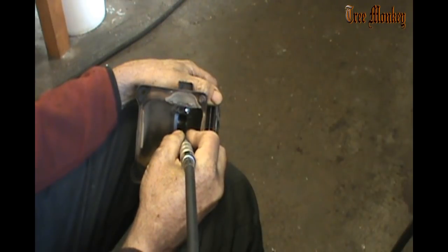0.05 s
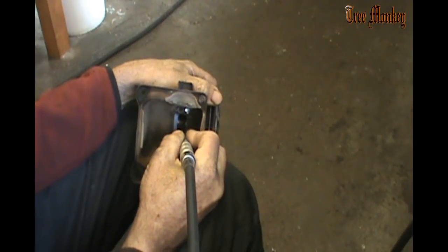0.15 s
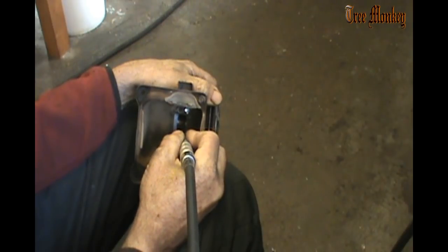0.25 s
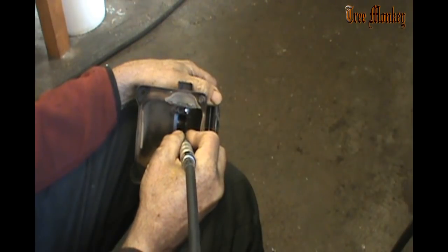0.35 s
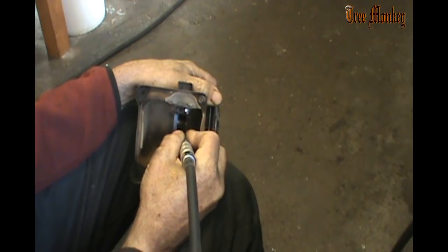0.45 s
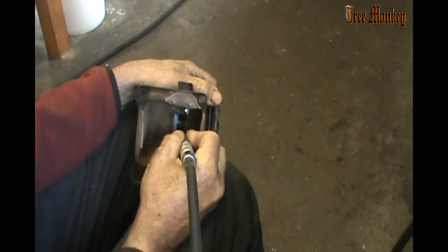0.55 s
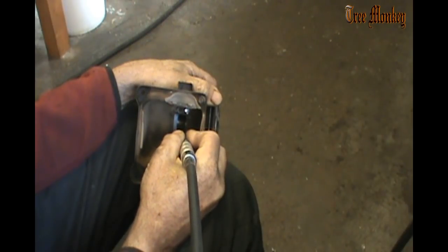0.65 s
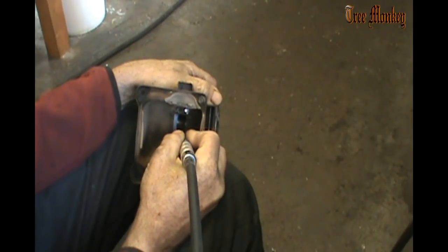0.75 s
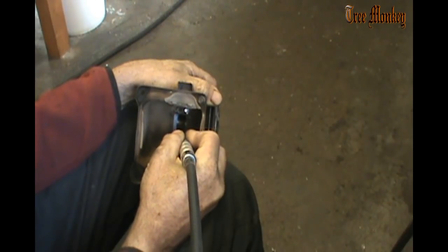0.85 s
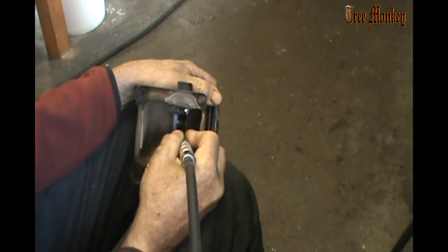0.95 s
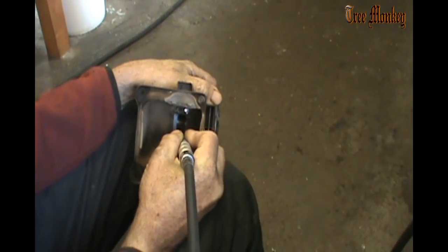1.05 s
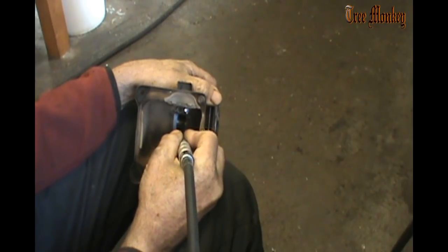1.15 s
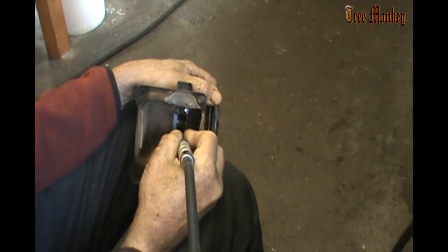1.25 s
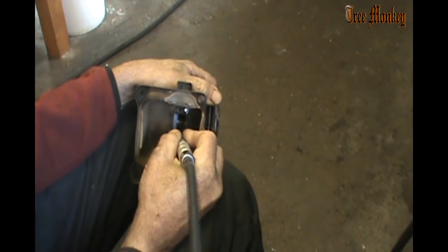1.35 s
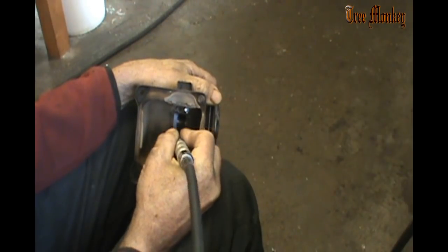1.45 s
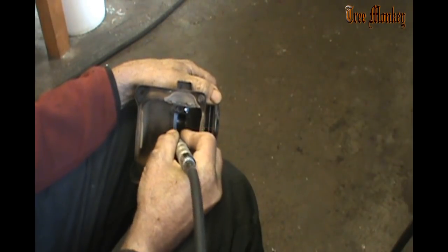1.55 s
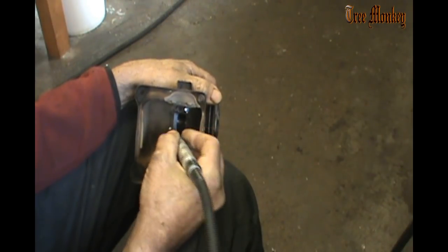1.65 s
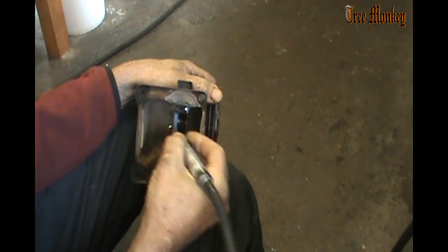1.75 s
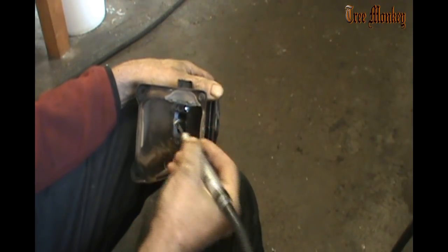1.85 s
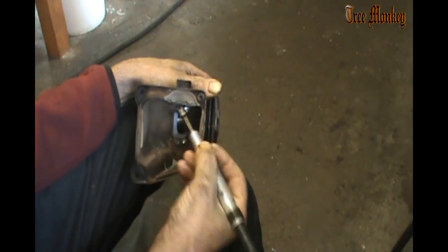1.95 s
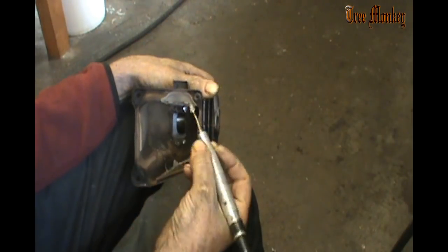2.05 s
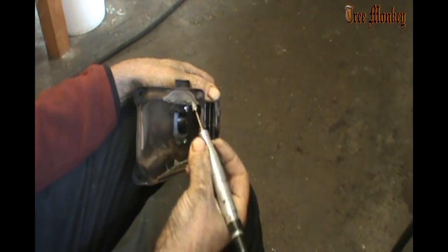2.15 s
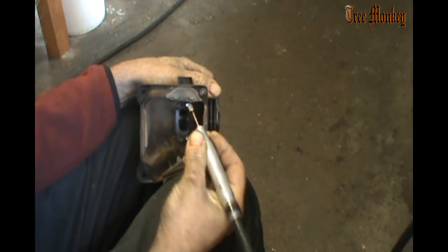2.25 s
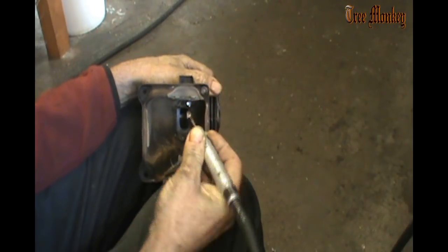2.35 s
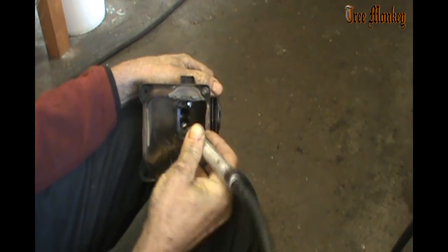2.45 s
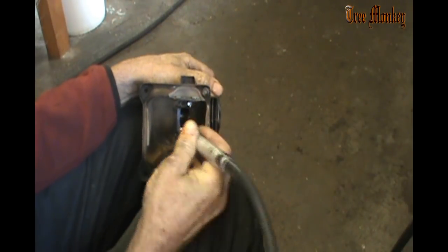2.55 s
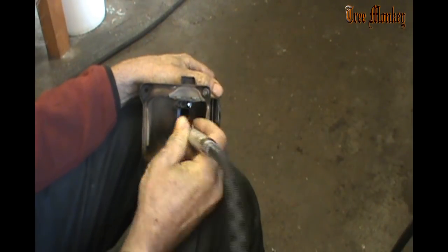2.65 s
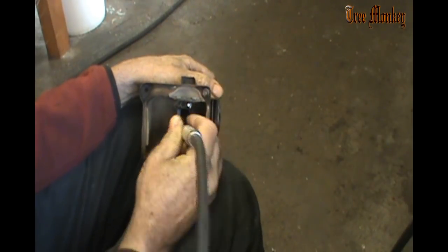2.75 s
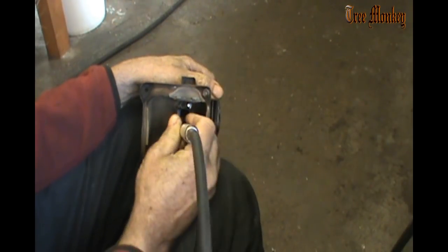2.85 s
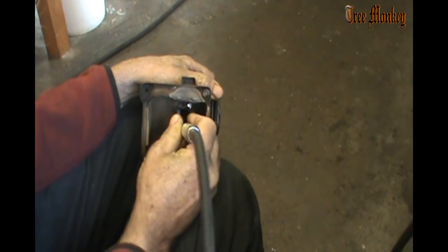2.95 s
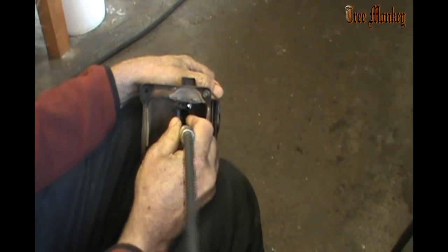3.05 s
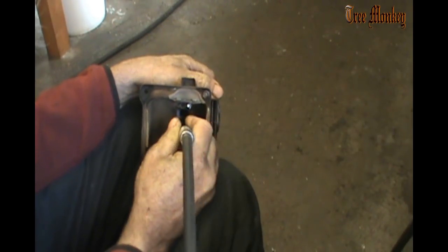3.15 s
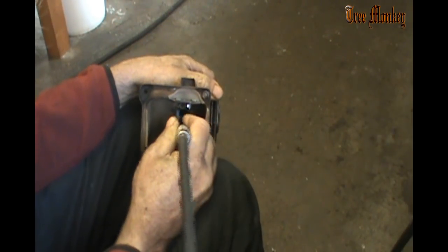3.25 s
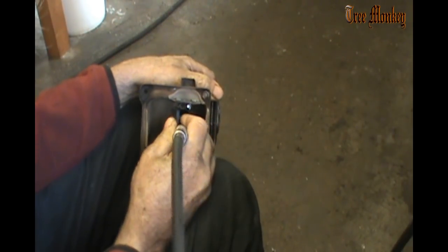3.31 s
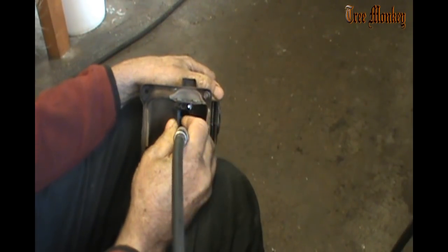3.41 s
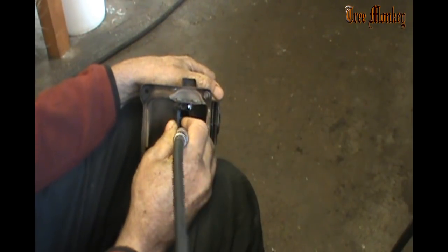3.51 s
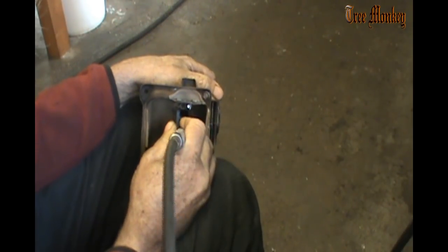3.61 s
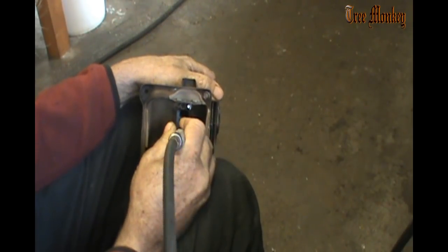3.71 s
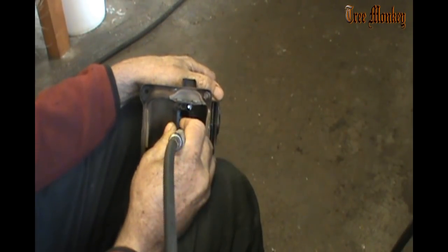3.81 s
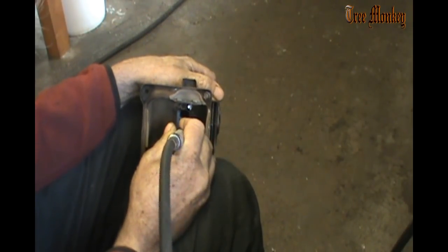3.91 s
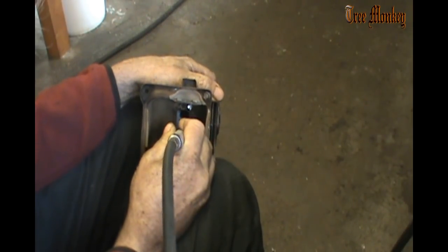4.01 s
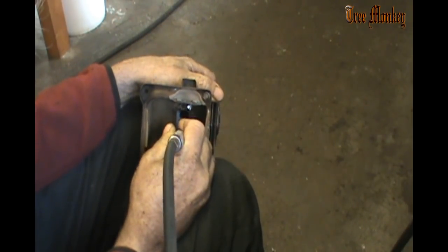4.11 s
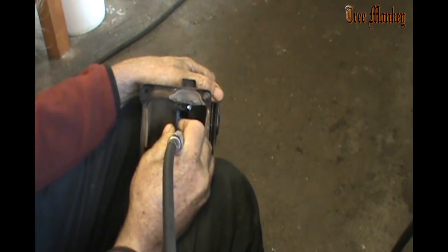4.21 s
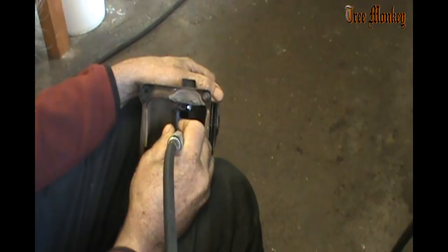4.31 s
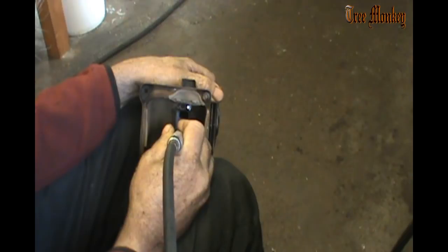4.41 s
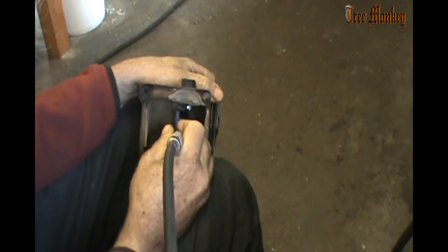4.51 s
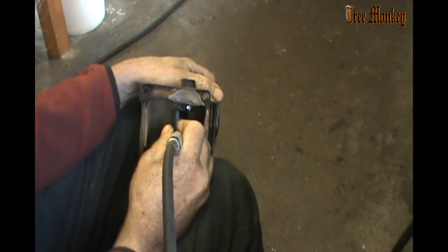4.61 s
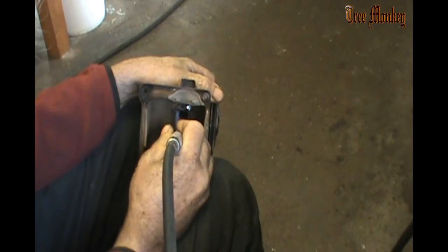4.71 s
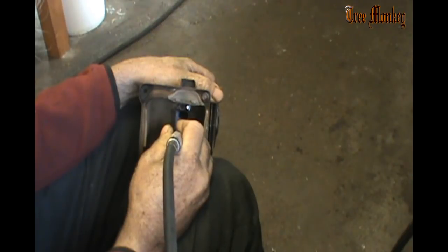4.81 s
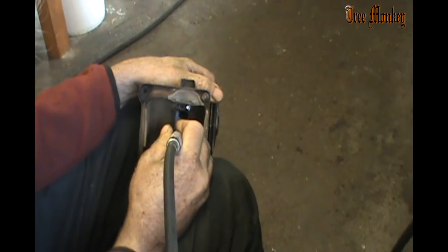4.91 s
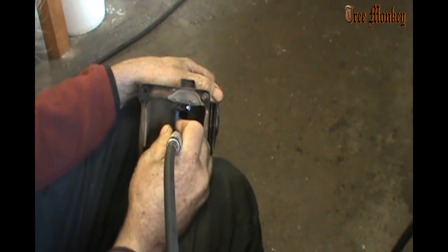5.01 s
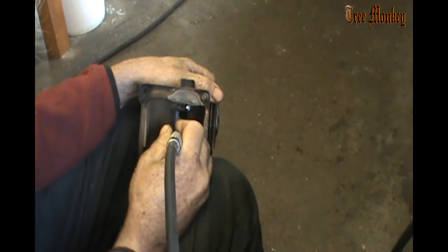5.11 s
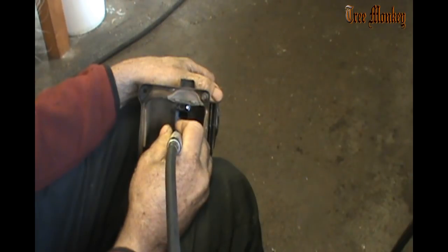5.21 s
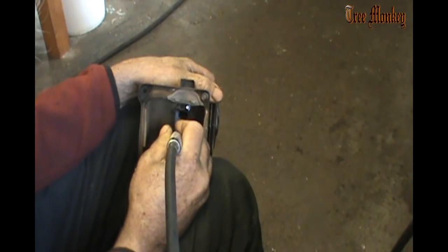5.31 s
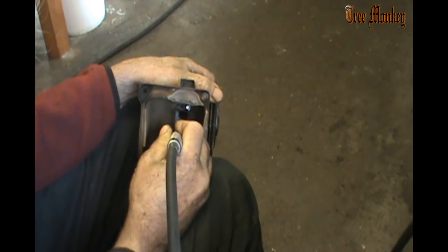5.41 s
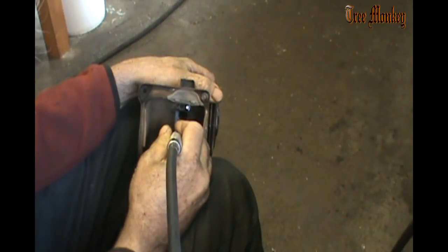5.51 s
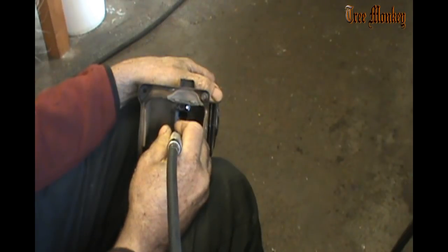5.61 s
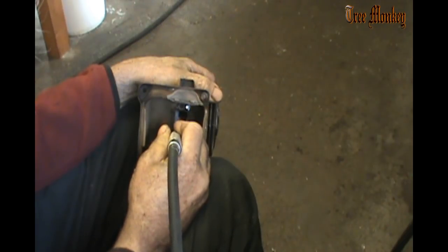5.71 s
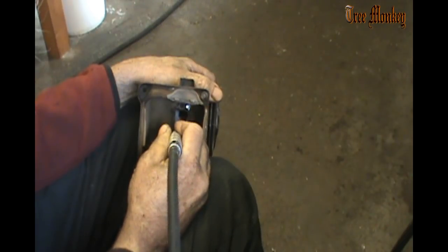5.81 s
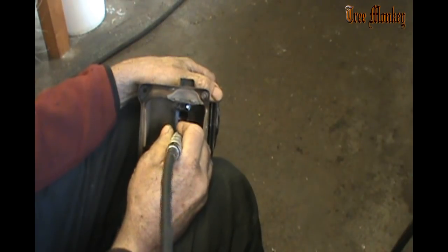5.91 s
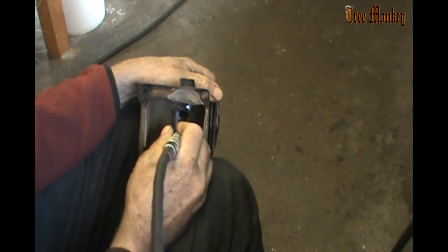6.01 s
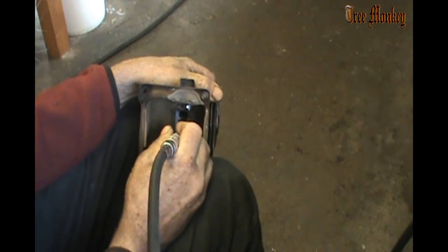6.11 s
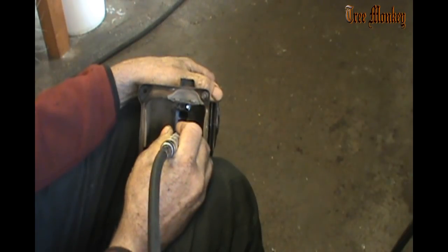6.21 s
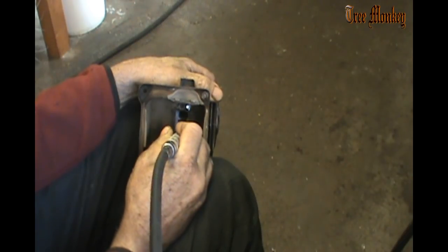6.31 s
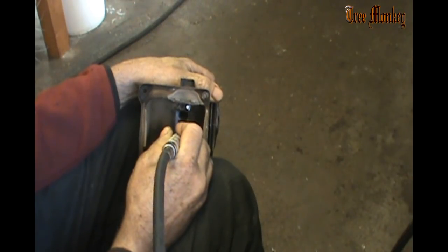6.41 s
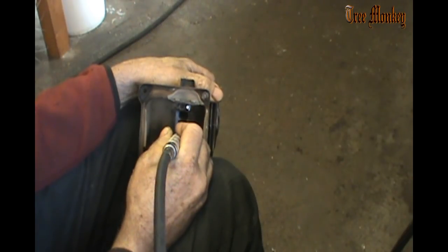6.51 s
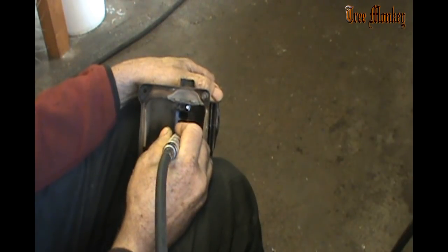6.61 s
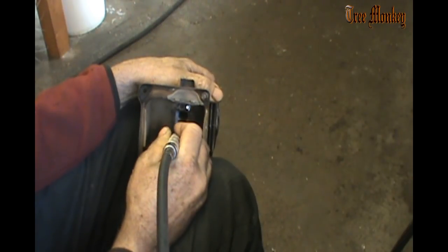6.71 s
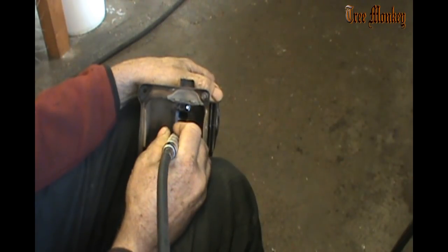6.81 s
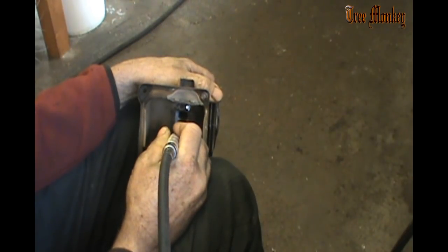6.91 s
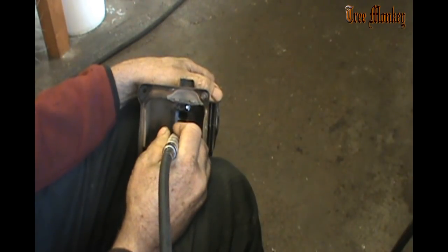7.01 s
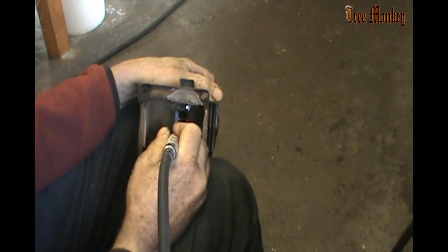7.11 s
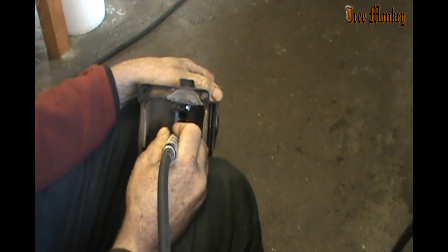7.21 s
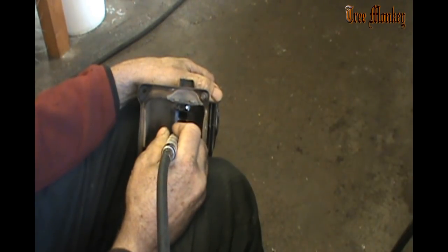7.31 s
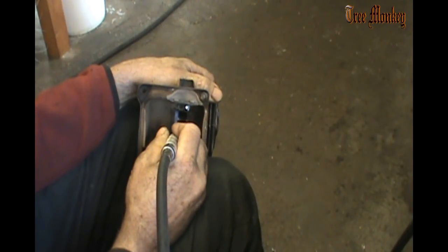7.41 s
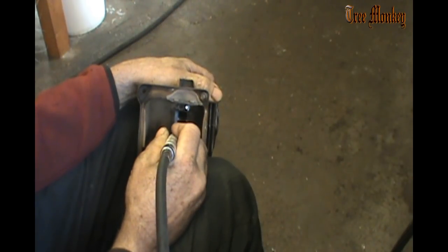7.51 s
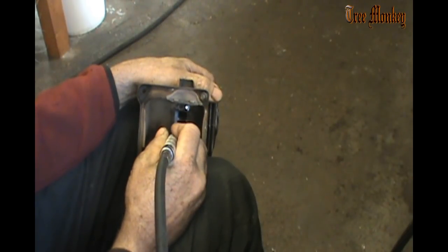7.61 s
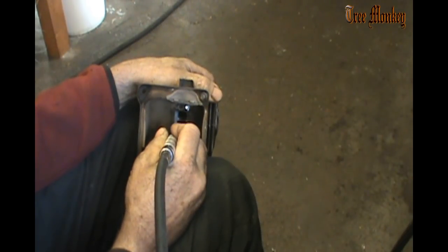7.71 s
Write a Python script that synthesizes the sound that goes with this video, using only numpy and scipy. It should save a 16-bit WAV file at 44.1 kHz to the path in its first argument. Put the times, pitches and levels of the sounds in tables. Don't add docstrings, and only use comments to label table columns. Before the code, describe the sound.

A handheld rotary burr hisses harshly against hollow steel, lifts away to leave its motor whirring and humming, then bites again twice in a workshop.

```python
import sys
import numpy as np
from scipy import signal
from scipy.fft import rfft, irfft
from scipy.io import wavfile
from scipy.ndimage import uniform_filter1d

SR = 44100
rng = np.random.default_rng(int(sys.argv[2]) if len(sys.argv) > 2 else 0)


def amplitude_ratio(level_db):
    exponent = np.asarray(level_db, float) / 20
    return 10 ** exponent


def dump_mix(stems):
    frames = np.atleast_2d(stems).T
    limited = np.clip(frames, -1, 1)
    pcm = np.round(limited * 32767).astype(np.int16)
    wavfile.write(sys.argv[1], SR, pcm)


N = 341768

# start_s, speed_turns_per_s
SHAFT_SPEED = [(0, 229.1), (.8, 223), (1.15, 223), (1.6, 228.5), (1.78, 228.4), (1.93, 230.5), (2.3, 223.1),
               (2.8, 220.5), (3.05, 222.4), (3.8, 225.6), (4.0, 228.4), (4.6, 228.5), (5.0, 226.1),
               (5.5, 226.3), (6.25, 230.9), (6.75, 228.7), (7.05, 226.6), (7.75, 223)]
# start_s, level_db
RECORDER_GAIN = [(0, -34.5), (.85, -35), (1.42, -31.5), (1.9, -29), (2.4, -27.5), (2.6, -27), (3.0, -26),
                 (3.5, -24), (4.08, -23), (4.17, -32), (4.55, -32), (5.02, -37), (5.58, -33), (5.95, -30),
                 (6.52, -30), (6.61, -39), (6.88, -34), (7.75, -36)]

# pitch_hz, density_db (per Hz)
AIR_SPECTRUM = [(15, -62), (25, -53), (90, -29.5), (284, -21), (400, -14.5), (620, -14.5), (881, -13),
                (1120, -3.5), (1930, -15.5), (3500, -17.5), (7420, -17.5), (10800, -14), (14000, -21),
                (17000, -15)]
# pitch_hz, width_hz, level_db
HOUSING_MODES = [(505, 22, -23.5), (792, 58, -4), (1152, 46, 4.5), (1289, 87, -7), (2460, 93, -9),
                 (11000, 310, -24.5)]
# pitch_hz, level_db
MAINS_HUM = [(59.3, -2), (118.6, -2)]
HUM_DB, HUM_WAVER_DB = -28, 3.5
DRONE_HZ, DRONE_REST_DB, DRONE_EDGE_S = 351.5, -28.5, 0.059
# start_s, length_s, added_db
DRONE_SPELLS = [
    (.12, 0.68, 4.5),
    (.82, 0.5, 14),
    (1.58, .17, 16),
    (1.96, 0.07, 10),
    (2.44, 1.7, 13),
    (5.96, .12, 13),
    (6.16, 0.22, 16.5),
    (7.15, .12, 9),
    (7.6, .12, 11),
]
ORDER_SPEEDS = [220.5, 223, 225.5, 227, 228.4, 229.4, 230.8]
ORDER_LEVELS_DB = [
    [-8.5, -7, -9, -11.5, -15.5, -14, -7.5],
    [-7, -10, -10, -9.5, -13.5, -10, -13.5],
    [-27, -25, -29, -29, -29.5, -29, -20.5],
    [-27, -28.5, -24, -34.5, -26.5, -25, -21],
    [-14.5, -14, -17.5, -16, -9.5, -14, -2],
]
ORDER_WAVERS_DB = [1.8, 1.6, 1.2, 2, .8]
WHINE_LOADED_DB = -6.5

# start_s, pressure_db, angle (flat - to steep +)
CONTACTS = [
    [(0, -17, -2), (.59, -16, 0), (.96, -17.5, -2.5), (1.05, -18, -2), (1.41, -17.5, -1.5),
     (1.5, -19.5, -0.5), (1.535, -33, -4), (1.62, -30.5, -5.5), (1.7, -38.5, -5)],
    [(3.75, -33, 2), (4.04, -22.5, -0.5), (4.07, -16.5, -0.5), (4.56, -16, -0.5), (4.77, -16, 0.),
     (4.87, -15, 3.5), (5.72, -18, -2.5), (5.83, -16.5, 1), (5.89, -40, -9.5)],
    [(6.14, -47, 0.), (6.17, -22, 2.5), (6.22, -21, -0.5), (6.434, -18.5, -3.5), (6.55, -17, -1),
     (6.6, -16, 1.5), (7.2, -16, 0.5), (7.45, -16.5, -0.5), (7.75, -17, -1.5)],
]
# centre_s, half_width_s, added_db
BURR_SKIPS = [
    (1.465, 0.0098, -3.5),
    (1.562, .012, 3),
    (1.652, 0.013, 6),
    (3.85, 0.056, 9.5),
    (3.992, 0.016, 5),
]
# pitch_hz, width_hz
STEEL_MODES = [(3132, 16), (3324, 20), (3690, 70), (4000, 50), (4190, 30), (4401, 22), (5200, 120), (5485, 55),
               (5650, 120), (6260, 160), (6500, 120), (6800, 70), (6990, 28), (7500, 90),
               (7835, 50), (8030, 70), (8570, 100), (8830, 30), (9150, 160), (9482, 45), (9900, 72), (10380, 110),
         (10640, 100), (11260, 160), (11700, 260), (12630, 90), (12820, 100), (13560, 90)]
SPOT_TIMES = [
    .25,
    1.15,
    3.75,
    6.0,
    6.3,
]
# first_start_db, first_end_db, second_db, third_db (by
STEEL_DRIVE = [(-4, 7.5, 3.5, 3.5), (4, 10.7, 9.5, 12), (5, 1, 4, 5), (8, 14.8, 12, 12),
               (3, 13.6, 10.5, 12.5), (-3, 7.3, 14, 15), (0, 2.8, -7, 3), (14, 12, 14, 12.5),
               (18, 5.7, 3, 9.5), (11, 8, 10, 9.5), (1, 11.5, 7, 5), (14, 13, 11, 12.5), (5, 9, 4, 9),
               (6, 3, -12, 2),
               (-3, 5, 13.5, 16.5), (2, 14, 13.5, 2), (5, 13, 3, 12), (7, 15, 7, 8), (2, -1, 12.5, 11.5),
              (4, 20, 13, 15.5), (14, -3, 5, 7), (15.5, 5, -7, -2), (7, 10, 13, 11.5), (17.5, 18.5, 17, 16),
              (4, -1, 14, 13.5), (10, 5, 15.5, 18.5), (14, 10, 15.5, 13), (8, 4, 3, 5)]
# pitch_hz, density_db (per Hz)
SMALL_MODE_SPECTRUM = [(900, -32), (1650, -3.5), (2100, -15.5), (2900, -12.5), (3500, -12.5), (4600, -4.5),
                       (5900, -1.5), (7250, -4), (8500, -3), (11500, 3.5), (13300, -0.5), (14000, -8),
                       (15000, -6), (17000, -21)]
SMALL_T60_S = .08
BAND_BORDERS = [2900, 4800, 7300]
CONTACT_RUMBLE_DB = [
    -1.5,
    -7.5,
    -6,
]
FULL_BITE_DB, RUMBLE_FOLLOWS = -11, 0.3
LOW_DB, MIDDLE_DB = -9.5, -8
LOW_PER_ANGLE_DB, MIDDLE_PER_ANGLE_DB = -1.9, -1.13
WANDER_DB = 0.57

# pitch_hz, likeness (0-1), left_minus_right_db, left_lead_rad
MOTOR_PORTS = [(100, .98, -.1, 0), (230, 1, -.3, .18), (450, .64, -.5, -.48), (790, .95, -3.9, -.72),
               (1230, .88, -6, -1.2), (1690, .95, -5.5, -1), (2480, .6, -3.5, -1.94), (3450, 1, -5, -1.77),
               (6440, .32, -1, -.96), (9900, 1, .5, -.97), (14500, .45, -3, -.07)]
# pitch_hz, likeness (0-1), left_minus_right_db, left_lead_rad
BURR_PORTS = [(1500, .9, -.5, -.3), (2500, .9, -.9, -.4), (3500, .9, .4, -.05), (4500, .91, 1, -.07),
              (6000, .92, 1, -.05), (8000, .95, .2, .03), (10000, .97, .7, .08), (12000, .92, .3, .15),
              (13000, .9, 0, .25), (14200, .99, -.2, .1)]
CUTOFF_HZ = 15725


def rms_one(x):
    return x / np.sqrt(np.mean(x ** 2) + 1e-20)


def in_time(rows):
    seconds, *columns = np.transpose(rows)
    return [np.interp(np.arange(N) / SR, seconds, column) for column in columns]


def at_hz(points):
    hz, *columns = np.transpose(points)
    log_bins = np.log(np.fft.rfftfreq(N, 1 / SR) + 1)
    return [np.interp(log_bins, np.log(hz), column) for column in columns]


def drift(rate):
    r = np.exp(-80 * np.pi * rate / SR)
    noise = rng.standard_normal(N // 40 + 2002)
    slow = signal.lfilter([1], [1, -2 * r, r * r], noise)[2000:]
    return np.interp(np.arange(N) / 40, np.arange(len(slow)), rms_one(slow))


def resonance(x, hz, width):
    r = np.exp(-np.pi * width / SR)
    zeros = np.array([1, 0, -1]) * (1 - r * r) / 2
    poles = [1, -2 * r * np.cos(2 * np.pi * hz / SR), r * r]
    return signal.lfilter(zeros, poles, x)


def coloured(x, spectrum):
    return rms_one(irfft(rfft(x) * amplitude_ratio(at_hz(spectrum)[0]), N))


def contact(rows):
    t = np.arange(N) / SR
    touching = (t >= rows[0][0]) & (t <= rows[-1][0])
    return uniform_filter1d(1. * touching, size=600, mode="nearest")


def spells(rows, edge_s):
    t = np.arange(N) / SR
    total_db = 0
    for start, length, db in rows:
        inside_s = np.minimum(t - start, start + length - t)
        total_db = total_db + db * np.clip(inside_s / edge_s + .5, 0, 1)
    return total_db


def motor(turns, air_db, orders_db):
    hum_db = air_db + HUM_DB + HUM_WAVER_DB * drift(8.5)
    drone_db = air_db + DRONE_REST_DB + spells(DRONE_SPELLS, DRONE_EDGE_S) + 3.6 * drift(6.1)
    white = rng.standard_normal((2, N))
    housing = np.zeros((2, N))
    for k, (hz, width, db) in enumerate(HOUSING_MODES):
        housing += (-1) ** k * amplitude_ratio(db) * resonance(white, hz, width)
    rush = coloured(rng.standard_normal((2, N)), AIR_SPECTRUM) + amplitude_ratio(-4.0) * rms_one(housing)
    out = amplitude_ratio(air_db + 4.0 + 0.37 * drift(11.4)) * rush
    drone_phase = 2 * np.pi * np.cumsum(DRONE_HZ + 3.44 * drift(4.5)) / SR
    out[0] += amplitude_ratio(drone_db - 0.2) * np.sqrt(2) * np.sin(drone_phase)
    for hz, db in MAINS_HUM:
        level = amplitude_ratio(hum_db + db + 1.0 * drift(3.6))
        out[0] += level * np.sin(2 * np.pi * hz * np.arange(N) / SR)
    for order, db, waver_db in zip([2, 4, 1, 3, 16], orders_db, ORDER_WAVERS_DB):
        level = amplitude_ratio(db + 2.0 + waver_db * drift(4.2))
        out[0] += np.sqrt(2) * level * np.sin(order * turns)
    return out


def cutting_teeth(turns):
    throb = 1 + 0.7 * np.sin(turns) * amplitude_ratio(2 * drift(3))
    return rng.standard_normal((2, N)) * throb * amplitude_ratio(0.27 * drift(29.0))


def casting_modes(teeth):
    t = np.arange(N) / SR
    modes = np.zeros((2, N))
    for k, ((hz, width), spots_db) in enumerate(zip(STEEL_MODES, STEEL_DRIVE)):
        spot_db = np.interp(t, SPOT_TIMES, np.repeat(spots_db, [1, 1, 2, 1]))
        drive = amplitude_ratio(spot_db + 0.63 * drift(4.6))
        ringing = resonance(resonance(teeth, hz, 4 * width), hz, 1.1 * width)
        modes += (-1) ** k * drive * ringing
    return rms_one(modes)


def small_modes(x):
    length = SR // 4
    response = rng.standard_normal(length) * amplitude_ratio(-60 * np.arange(length) / SR / SMALL_T60_S)
    response[0] = 30
    return coloured(signal.fftconvolve(x, response[None], axes=1)[:, :N], SMALL_MODE_SPECTRUM)


def bands(x):
    below = []
    for hz in BAND_BORDERS:
        below.append(signal.sosfiltfilt(signal.butter(4, hz, fs=SR, output="sos"), x))
    return np.diff([0 * x, *below, x], axis=0)


def burr(turns, gain_db):
    t = np.arange(N) / SR
    teeth = cutting_teeth(turns)
    parts = bands(casting_modes(teeth) + amplitude_ratio(-2.0) * small_modes(teeth[::-1]))
    parts /= np.sqrt(uniform_filter1d(parts[:, :1] ** 2, size=9000))
    skips_db = sum(db * np.exp(-((t - s) / half) ** 2) for s, half, db in BURR_SKIPS)
    wander_db = WANDER_DB * np.array([drift(1.4), drift(12.0), drift(5.9), 0.26 * drift(6.6)])
    out = np.zeros((2, N))
    for rows, rumble_db in zip(CONTACTS, CONTACT_RUMBLE_DB):
        pressure_db, angle = in_time(rows)
        bite_db = pressure_db + skips_db
        levels_db = wander_db + [
            gain_db + rumble_db + RUMBLE_FOLLOWS * (bite_db - FULL_BITE_DB),
            bite_db + LOW_DB + LOW_PER_ANGLE_DB * angle,
            bite_db + MIDDLE_DB + MIDDLE_PER_ANGLE_DB * angle,
            bite_db]
        out += contact(rows) * np.sum(amplitude_ratio(levels_db)[:, None] * parts, axis=0)
    return out


def place(pair, table):
    alike, tilt_db, lead = at_hz(table)
    alike = np.clip(alike, 0, 1)
    direct, diffuse = rfft(pair)
    side = np.array([[1], [-1]])
    ports = np.sqrt((1 + alike) / 2) * direct + side * np.sqrt((1 - alike) / 2) * diffuse
    return irfft(ports * amplitude_ratio(side * tilt_db / 2) * np.exp(.5j * side * lead), N)


def scene():
    speed, gain_db = in_time(SHAFT_SPEED)[0], in_time(RECORDER_GAIN)[0]
    turns = 2 * np.pi * np.cumsum(speed) / SR
    orders_db = [gain_db + np.interp(speed, ORDER_SPEEDS, row) for row in ORDER_LEVELS_DB]
    orders_db[-1] = orders_db[-1] + WHINE_LOADED_DB * sum(contact(rows) for rows in CONTACTS)
    motor_sound = place(motor(turns, gain_db, orders_db), MOTOR_PORTS)
    return motor_sound + place(burr(turns, gain_db), BURR_PORTS)


def low_pass(x):
    return signal.sosfilt(signal.butter(12, 16230, fs=SR, output="sos"), x)


def record(dry):
    top = signal.ellip(12, .5, 60, CUTOFF_HZ, fs=SR, output="sos")
    rounded = 0.9 * np.tanh(dry / 1.04)
    mix = signal.sosfilt(top, rounded)
    return low_pass(mix)


dry = scene()
out = record(dry)
dump_mix(out)
```